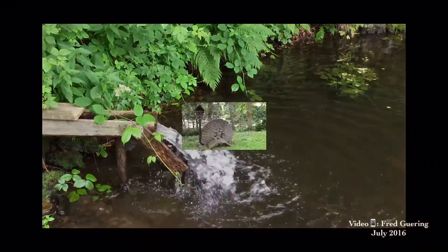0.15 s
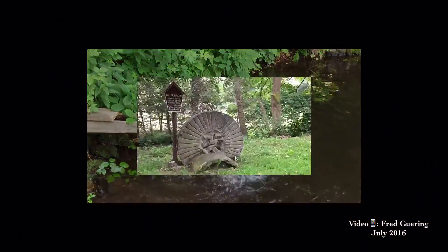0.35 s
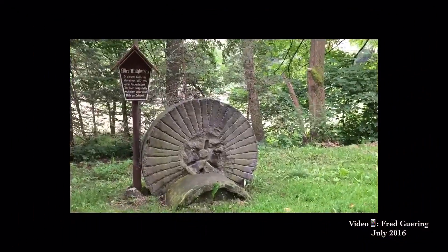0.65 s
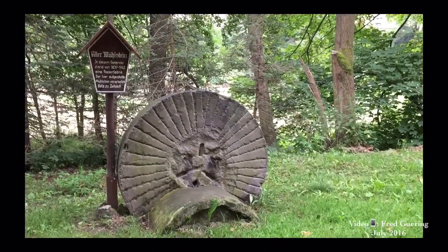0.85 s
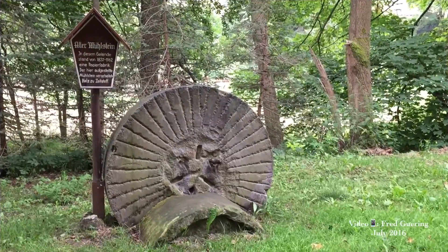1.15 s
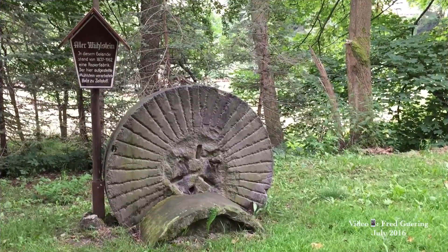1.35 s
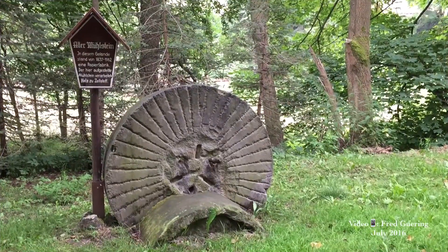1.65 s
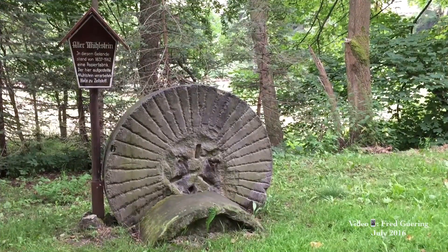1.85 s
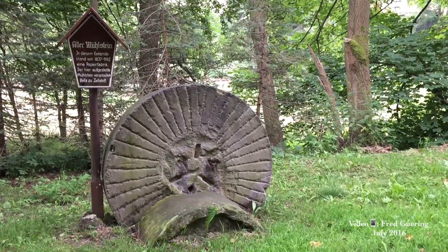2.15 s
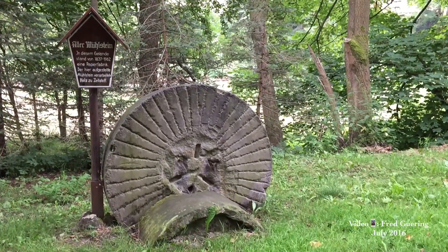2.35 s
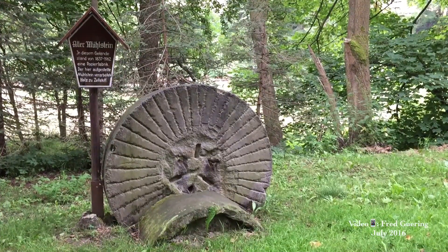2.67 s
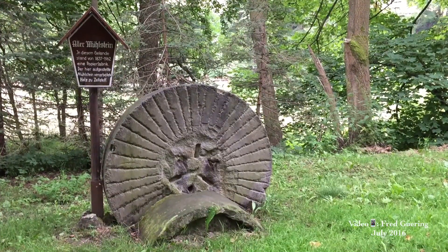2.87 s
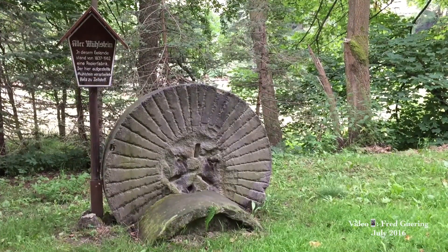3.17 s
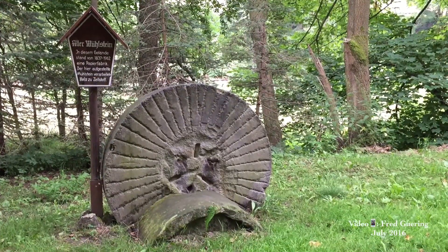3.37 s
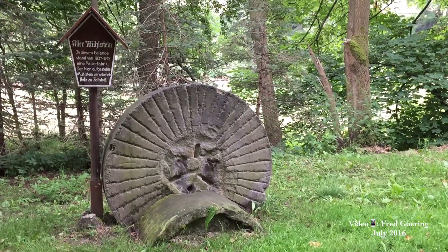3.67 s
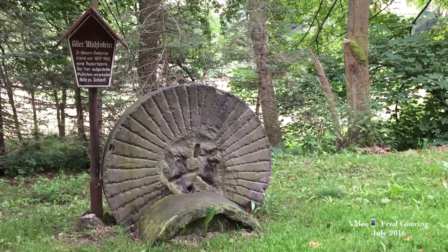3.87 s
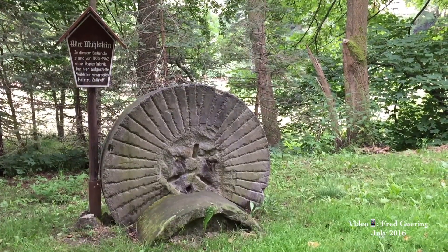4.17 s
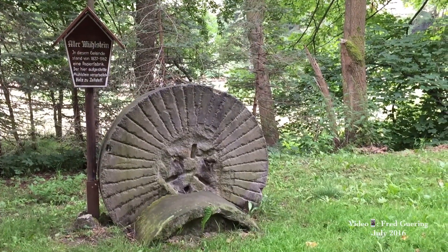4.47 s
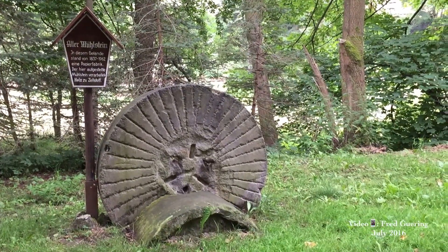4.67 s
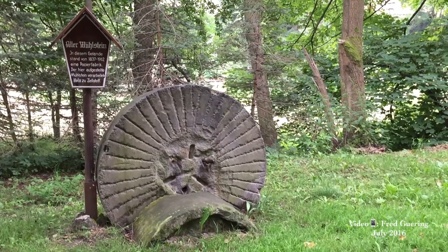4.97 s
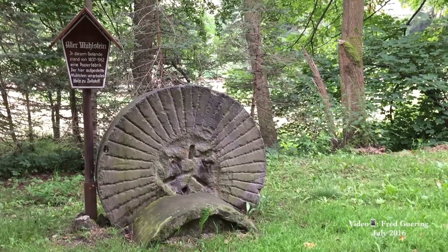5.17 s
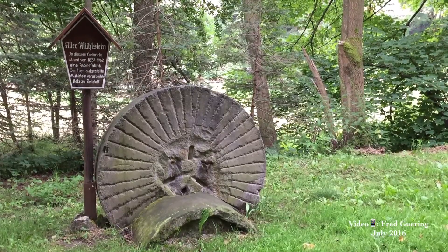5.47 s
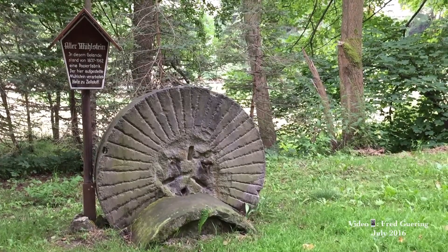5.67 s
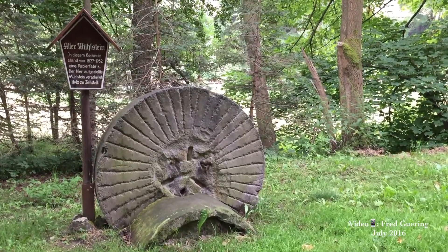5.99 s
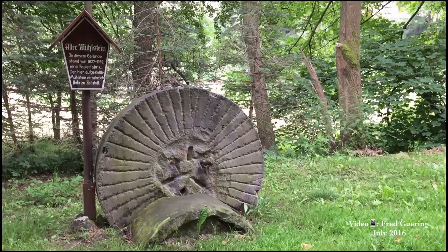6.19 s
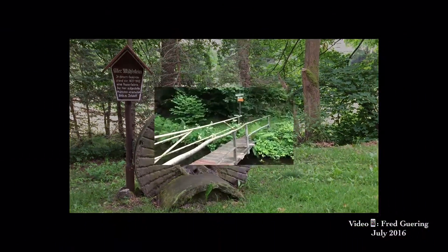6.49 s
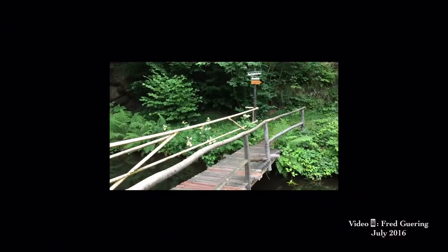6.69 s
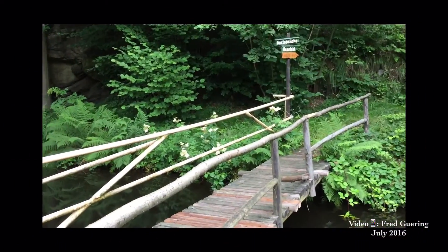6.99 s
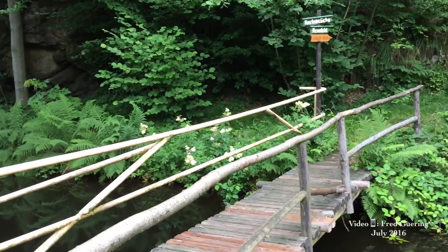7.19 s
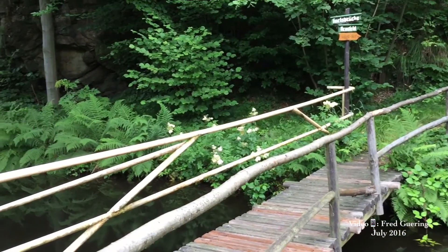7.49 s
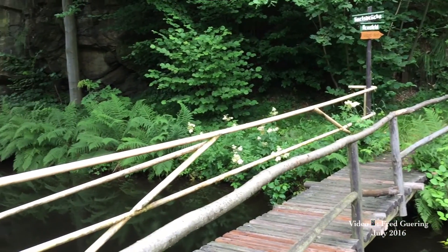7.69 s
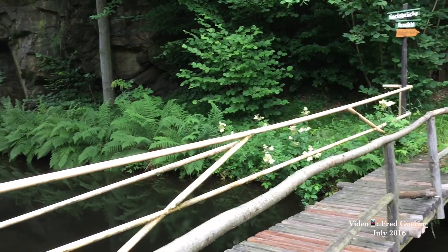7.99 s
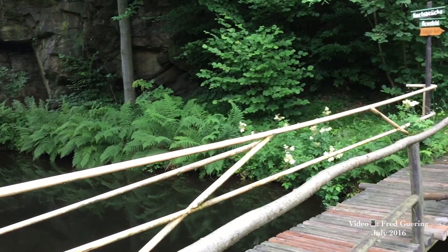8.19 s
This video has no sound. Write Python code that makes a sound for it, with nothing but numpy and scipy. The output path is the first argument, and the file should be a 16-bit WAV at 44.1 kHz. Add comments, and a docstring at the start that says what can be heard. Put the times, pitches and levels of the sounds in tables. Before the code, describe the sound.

Water surges from a spout into a pool, splashing and bubbling close to the microphone, and cuts off after about a second. A quiet wood follows, where songbirds whistle, chirp and buzz with a light echo, and dry leaves crunch briefly nearby. Near the end, a low lumpy rumble, three dull thumps on a wooden footbridge and a soft rush of water come in, while a small bird repeats four high falling notes.

```python
"""Water surges from a spout and splashes into a pool, full of ringing bubbles, until a hard cut.
Then comes a quiet clearing in a wood: songbirds whistle and buzz, their song echoes off the trunks,
and leaves crunch nearby. Last is a footbridge, with a low lumpy rumble, three dull thumps and a soft
rush of water; the birds sing on, and a small one repeats four falling notes."""
import sys
import numpy as np
from scipy import signal
from scipy.fft import rfft, irfft, next_fast_len
from scipy.io import wavfile
from scipy.ndimage import uniform_filter1d, map_coordinates

SR = 44100
rng = np.random.default_rng(int(sys.argv[2]) if len(sys.argv) > 2 else 0)


def master(y):
    """Save y as 16-bit WAV."""
    cut = np.clip(np.atleast_2d(y).T, -1, 1)
    pcm = np.round(cut * 32767)  # scale
    wavfile.write(sys.argv[1], SR, pcm.astype(np.int16))


N = 367794
TIME = np.arange(N) / SR
POOL_END_S, BRIDGE_START_S = 1.027, 6.245
STREAM_DB = -44  # the steady flow between surges


def pool():
    """Falling water roars, gurgles and sprays: each is noise plus bubbles, swelling with the flow."""
    # tone colour of the roar, the gurgle and the spray: f/Hz, relative level/dB
    plunge_colour = [(40, -28), (150, -25), (400, -24), (800, -13), (1000, -5.5), (1200, -8), (1500, 0.5),
                     (2100, -5.5), (4000, -9), (6000, -17), (9000, -48), (16000, -120)]
    gurgle_colour = [(150, -15.5), (350, -11.5), (500, -4.5), (650, 2), (850, -3), (1200, -24),
                     (3000, -120)]
    spray_colour = [(1180, -25), (2000, -2), (3310, -1), (4900, -5.5), (5730, -2), (7700, -9), (9010, -5.5),
                    (10500, -11), (15100, -9.5), (16000, -14)]
    spray_db = flow()
    # the roar swings less than the spray; the gurgle swings more and comes late
    plunge_db = STREAM_DB - 2 + 0.93 * (spray_db - STREAM_DB) + 2 * wobble(18.7)
    late_db = np.interp(TIME - 0.046, TIME, spray_db)
    gurgle_db = STREAM_DB - 12.5 + 1.24 * (late_db - STREAM_DB) + 2.7 * wobble(25.4)
    plunge = 0.8 * rush(plunge_colour, patchy_db=4.5)
    plunge += 0.45 * bubbles(centre_hz=1620, spread=0.4, cycles=7.6, size_db=3, count=800)
    gurgle = 0.63 * rush(gurgle_colour, patchy_db=-0.5)
    gurgle += 0.55 * bubbles(centre_hz=684, spread=0.21, cycles=15, size_db=4, count=150)
    spray = 0.93 * rush(spray_colour, patchy_db=2.7)
    spray += 0.38 * bubbles(centre_hz=8000, spread=0.51, cycles=6, size_db=5.5, count=700)
    flicker = amp(1.3 * wobble(40.27))
    water = flicker * (amp(plunge_db) * plunge + amp(gurgle_db) * gurgle + amp(spray_db) * spray)
    return (water + gulps() + droplets()) * (TIME < POOL_END_S)


def flow():
    """The jet's strength in dB: a steady stream plus surges that rise fast, drop and drain away."""
    # the top of each surge: t/s, level/dB
    surges = [(0, -36), (.09, -40.5), (.15, -42), (.408, -35), (.52, -40.5), (.685, -44), (0.747, -34.5),
              (.81, -42), (1.003, -33)]
    rise_s, hold_s, drop_s, drain_s = 0.019, 0.018, 0.032, 0.13
    top_s, db = np.transpose(surges)[:, :, None]
    t = TIME[:round(POOL_END_S * SR)] - top_s
    after = np.maximum(t - hold_s, 0)
    fall = (np.exp(-after / drop_s) + amp(-1) * np.exp(-after / drain_s)) / (1 + amp(-1))
    shape = np.where(t < 0, np.exp(np.minimum(t, 0) / rise_s), fall)
    strength = np.sqrt(amp(STREAM_DB) ** 2 + ((amp(db) * shape) ** 2).sum(axis=0))
    return np.pad(20 * np.log10(strength), (0, N - len(strength)), "edge")


def bubbles(centre_hz, spread, cycles, size_db, count):
    """A swarm of small bubbles, each a short fading tone that rises in pitch."""
    draw, t = rng.standard_normal((count, 2)), TIME[:1200]
    hz = centre_hz * np.exp(spread * np.clip(draw[:, :1], -1.5, 2))
    age = t * hz / cycles  # at age 1 the ring has dropped about 26 dB
    size = amp(size_db * np.minimum(rng.exponential(size=(count, 1)), 3))
    level = size * np.exp(-3 * age) * (1 - np.exp(-25 * age))
    rings = level * np.sin(2 * np.pi * hz * t * (1 + 0.15 * age))
    at = (rng.random((count, 1)) * POOL_END_S * SR).astype(int) + np.arange(len(t))
    track = np.bincount(at.ravel(), rings.ravel(), N)
    return track / np.sqrt(np.mean(track[:round(POOL_END_S * SR)] ** 2))


def gulps():
    """Single large bubbles ring, rising in pitch as they near the surface."""
    # large bubbles: t/s, level/dB, f/Hz, fade time/s
    big_bubbles = [(.008, -22.5, 1500, 0.027), (.078, -27, 1470, 0.026), (.124, -17.5, 800, 0.012),
                   (.155, -38, 198, 0.12), (.399, -20, 790, 0.014), (.503, -40, 608, 0.2),
                   (.528, -23, 900, 0.017), (.57, -30.5, 660, 0.03), (.605, -20, 2900, 0.0079),
                   (.689, -30.5, 1760, 0.058), (.764, -24.5, 1440, 0.033), (.802, -29.5, 987, 0.066),
                   (.815, -23, 1210, 0.018)]
    track, t = np.zeros(N), TIME[:SR // 5]
    for start, db, hz, fade_s in big_bubbles:
        tone = np.sin(2 * np.pi * hz * t * (1 + 0.11 * t / fade_s))
        add(track, start, strike(t, db, fade_s, rise_s=2.1 / hz) * tone)
    return track


def droplets():
    """A landing droplet ticks: a very short high tone mixed with noise."""
    # droplet ticks: t/s, level/dB, f/Hz
    drops = [(0.117, -45, 9100), (0.155, -29, 8700), (0.202, -37, 8200), (0.253, -37, 8730),
             (0.2973, -36, 8600), (0.3404, -34, 9100), (0.4908, -28, 13600), (0.5162, -32, 7040),
             (0.663, -28.5, 8670), (0.6828, -53, 7100), (0.7203, -33, 11400), (0.743, -25, 8800),
             (0.9105, -34, 9330), (1.006, -27, 8400)]
    track, t = np.zeros(N), TIME[:SR // 5]
    for start, db, hz in drops:
        hiss = 0.5 * np.diff(rng.normal(size=len(t) + 1))
        add(track, start, amp(db - 60 * t / 0.0073) * (np.sin(2 * np.pi * hz * t) + hiss))
    return track


def birds():
    """Gliding whistles; a fast pitch swing makes a buzz. Returns the direct part and the whole song."""
    # songbird notes: t/s, length/s, first f/Hz, middle f/Hz, last f/Hz,
    # relative level/dB, swell from first to last/dB, buzz depth/Hz
    notes = [ (0.041, 0.086, 3700, 3150, 2670, -44, -3, 3),
             (1.031, 0.086, 3530, 2930, 2290, -61.5, -27, -8), (1.15, 0.038, 2813, 2820, 2830, -57, 0, 40),
             (1.216, .1, 4070, 4500, 4500, -68, -1, 41), (1.275, 0.045, 4350, 3500, 2800, -65, -3, 0),
             (1.299, 0.33, 5500, 5380, 5250, -69.5, 0, 120), (1.557, 0.054, 4660, 4140, 3580, -66.5, -8, 0),
             (1.701, 0.24, 6010, 6200, 6300, -70.5, 1, 150), (1.7, .08, 2550, 2950, 3270, -63.5, 7, 38),
             (1.78, 0.11, 3250, 3190, 3200, -63, 2, 44), (2.499, 0.18, 2000, 2000, 2055, -68, 0, 100),
             (1.879, 0.1, 3190, 2960, 2600, -63.5, -2, 150), (2.149, 0.2, 3560, 3560, 3560, -64.5, 6, -6),
             (2.15, .23, 4370, 4470, 4380, -73, -3, 302), (2.326, 0.033, 3540, 3140, 2450, -56, -15, 5),
             (2.39, 0.045, 3476, 3170, 2480, -54.5, -11, -3),
             (2.44, 0.081, 2790, 2470, 1990, -58.5, -11, 0), (2.508, .24, 5820, 5770, 5790, -81, 2, 0),
             (4.75, 0.11, 5110, 5330, 5400, -70, -6, 297), (1.331, 0.16, 2890, 3200, 2940, -72, -4, 150),
             (4.477, .12, 3470, 3330, 3220, -71, -5, 300), (2.398, 0.035, 4050, 4070, 4070, -64, -1, 0),
             (2.629, .05, 2170, 2630, 3250, -61.5, -3, 0), (2.953, 0.0083, 3850, 3930, 4100, -58, -3, 0),
             (3.139, .045, 2980, 3180, 3200, -55.5, 6, 46), (3.2, .13, 3040, 3130, 2734, -61.5, 6, 250),
             (3.287, 0.063, 4250, 3630, 3280, -63.5, -8, 0), (3.375, 0.027, 3850, 4290, 4640, -63, -2, 60),
             (3.395, 0.023, 3880, 3350, 2880, -60.5, 2, 0), (3.435, .045, 4260, 3720, 3440, -60.5, -4, -2),
             (3.449, 0.042, 2950, 3010, 3030, -53.5, 0, -3), (3.485, .022, 3030, 3500, 4370, -58, -2, -2),
             (3.526, .07, 4440, 4270, 4230, -55.5, -1, 112), (3.612, .05, 3504, 3106, 2250, -52.5, -12, -2),
             (3.69, 0.045, 2320, 2800, 2860, -56, -10, -4),
             (3.785, 0.17, 2520, 2300, 2137, -70.5, 14, 102.5), (4.178, .17, 2776, 2410, 2180, -63, -3, 0),
             (4.224, 0.083, 3000, 3095, 3190, -65, -1, 252), (4.328, 0.11, 3100, 3386, 3240, -59, 2, 152.5),
             (4.753, 0.12, 3480, 2914, 2880, -55.5, 2, 7), (4.836, 0.029, 3620, 3300, 2970, -52, 9, 0),
             (4.865, 0.094, 2970, 2877, 2736, -47.5, -8, 101),
             (4.941, 0.072, 2500, 2340, 2220, -62.5, -3, 202), (5.028, .03, 2690, 3030, 3430, -60, 16, 0),
             (5.08, .025, 4280, 4180, 4120, -64.5, 0, 60), (5.112, 0.13, 3540, 3370, 3140, -59.5, 8, 154),
             (5.268, 0.092, 2170, 2420, 2770, -54, 6, 100), (5.335, 0.085, 2780, 2974, 3274, -46, -1, 103),
             (5.468, 0.071, 3250, 2975, 2744, -44.5, -0.5, 1),
             (5.54, 0.035, 2740, 2647, 2480, -53.5, -9, 216), (5.485, 0.12, 4340, 4330, 4270, -70, -8, 0),
             (5.699, 0.13, 2790, 2400, 2280, -62.5, -7, 1), (5.695, 0.11, 4300, 4260, 4350, -70, -9, -3),
             (5.883, .043, 3050, 2790, 2620, -50, -4, 0), (5.92, .12, 2650, 2374, 2206, -49, -7, 5),
             (5.958, .035, 3850, 4060, 4160, -60.5, 5, 64), (6.05, 0.062, 2720, 3310, 3625, -46.5, 3, 367),
             (6.108, 0.044, 3627, 3486, 3170, -47, -3, 428), (6.451, .08, 3350, 2860, 2215, -44.5, -6, -9),
             (6.547, 0.12, 3050, 2523, 3350, -47.5, 0.5, 129.5), (6.6, .23, 2165, 2133, 2123, -61, 1, -8),
             (6.692, 0.014, 3870, 4020, 4240, -61, 16, 0), (6.775, 0.014, 3880, 4175, 4450, -59.5, -3, 0),
             (6.96, 0.03, 3650, 3640, 3600, -58, 2, 60), (6.981, 0.0087, 2510, 3260, 3870, -47.5, -8, 3),
             (6.989, 0.048, 3980, 3853, 3780, -48.5, 6, 59),
             (7.03, 0.23, 3720, 3698, 3736, -48.5, -10.5, 4),
             (7.033, .055, 4550, 4660, 4630, -59.5, -2, 60), (7.04, 0.08, 3600, 3250, 3280, -48.5, 1, 350),
             (7.095, 0.075, 4500, 4520, 4300, -59.5, -7, 446), (7.123, .025, 8300, 8100, 7900, -70, 8, 0),
             (7.182, 0.039, 3660, 2950, 2270, -53.5, -18, 0), (7.22, 0.062, 2280, 2265, 2250, -63, -8, 60),
             (5.936, .025, 3300, 3480, 3600, -64, 0, 0), (7.33, 0.046, 6580, 6580, 6570, -79, 0, 30),
             (7.3, 0.086, 3330, 2800, 2410, -57, -15, 3), (7.379, 0.11, 4790, 4840, 4830, -53, 19, -6),
             (7.425, .08, 2480, 2573, 2760, -49.5, 3, -2), (7.504, 0.062, 2740, 2696, 2750, -49, 7, 0),
             (7.464, 0.082, 2900, 3235, 2890, -56.5, 6, 0), (7.536, 0.044, 2700, 2213, 2200, -52, -11, -2),
             (7.588, .11, 2448, 2880, 2600, -53.5, -6, 350.5), ]
    # the small bird's four notes: same columns, t counted from the start of the phrase
    phrase = [(0, 0.074, 6670, 6560, 6450, -61.5, 5, 30), (.045, 0.062, 5570, 5660, 5550, -57.5, -8, 6),
              (.113, .02, 4810, 4815, 4810, -56.5, 2, 0.5), (.122, 0.044, 4296, 4214, 4200, -55.5, -3, 26)]
    # each time it sings them: t/s, gain/dB
    repeats = [(7.617, 1.5), (7.883, -1), (8.154, -6)]
    held_hz_per_s, arch_db = 700, 2  # a slower glide counts as held; notes arch up in the middle
    direct, song = np.zeros(N), np.zeros(N)
    flutter, waver = wobble(60), wobble(110)
    small_bird = [(start + delay, *shape, db + gain_db, swell, buzz)
                  for start, gain_db in repeats for delay, *shape, db, swell, buzz in phrase]
    for start, length, first, middle, last, level_db, swell_db, depth in notes + small_bird:
        # faint notes are far: moving air blurs them and less arrives direct; held whistles stay clearer
        distance = np.clip((-47 - level_db) / 20, 0.3, 1)
        held = depth == 0 and abs(last - first) < held_hz_per_s * length
        smear = distance * (0.3 if held else 1)
        fade = min(0.012 + 0.012 * distance, length / 2)
        begin = max(start - fade / 2, POOL_END_S if start > POOL_END_S else 0)
        t = np.arange(begin, min(start + length + fade / 2, N / SR - 0.001), 1 / SR)
        place = 2 * (t - start) / length - 1  # -1 to 1 across the note
        hz = middle + (last - first) / 2 * place + ((first + last) / 2 - middle) * place ** 2
        db = level_db + swell_db / 2 * place - arch_db * place ** 2
        buzz_hz = (55 + 0.2 * depth) * (1 + 0.042 * rng.normal())  # wider swings come faster
        swing = np.sin(2 * np.pi * buzz_hz * (t - start) + 0.018 * np.cumsum(rng.normal(size=len(t))))
        edges = np.sin(gate(t - start, length, fade) * np.pi / 2) ** 2
        pulse = 1 - np.clip(depth / 900, 0, 0.6) * swing  # a buzz is loudest at its lowest pitch
        level = np.sqrt(2) * amp(db) * edges * pulse
        span = slice(round(begin * SR), round(begin * SR) + len(t))
        blur_hz = (40 + 0.81 * depth) * smear * waver[span]
        tone = level * np.sin(2 * np.pi * np.cumsum(hz + depth * swing + blur_hz) / SR)
        add(song, begin, tone)
        add(direct, begin, tone * amp(smear * (5 * flutter[span] - 7)))
    return direct, song


def echoes(song):
    """Trunks scatter the song: every fifth of a second gets its own fading tail."""
    # how long the wood echoes: f/Hz, fade time/s
    trunks = [(1500, 0.99), (3000, 0.7), (4500, 0.73), (6000, 0.66), (8000, 0.31)]
    track, step = np.zeros(N), SR // 5
    for at in range(0, N, step):
        hz, t, bands = signal.stft(rng.standard_normal(SR), SR, nperseg=256)
        fading = strike(t, 0, along(trunks, hz)[:, None], rise_s=0.0022)
        tail = signal.istft(bands * fading, SR, nperseg=256)[1]
        add(track, at / SR + 0.008, signal.fftconvolve(song[at:at + step], tail / np.linalg.norm(tail)))
    return track


def thumps():
    """Low knocks whose pitch sags as the contact spreads, then dry leaves settling."""
    # knocks: t/s, level/dB, f/Hz, fade time/s, rustle level/dB, rustle fade time/s
    hits = [(2.769, -36, 200, 0.022, -47.5, 0.27), (2.966, -40.5, 394, 0.025, -49, 0.1),
            (3.49, -64.5, 186, 0.23, -83, 0.055), (3.625, -59.5, 249, 0.12, -85, .05),
            (3.935, -64.5, 259, 0.25, -85, .05), (4.18, -57, 343, 0.071, -57, 0.15),
            (4.78, -66, 336, 0.29, -87, .05), (6.525, -35, 130, 0.044, -76, 0.027),
            (6.553, -35.5, 124, 0.068, -70, .03), (6.646, -35.5, 141, 0.055, -70, 0.025)]
    # the footbridge's ringing: f/Hz, level relative to the knock/dB, fade time/s
    bridge_tones = [(400, -12, 0.056), (660, -7, 0.027)]
    # tone colour of dry leaves: f/Hz, relative level/dB
    leaf_colour = [(60, -27), (150, 7.5), (600, -1.5), (2000, -2.5), (4000, -8), (8000, -17), (13000, -40)]
    track, t = np.zeros(N), TIME[:SR // 4]
    for start, db, hz, fade_s, rustle_db, rustle_s in hits:
        sagging_hz = hz * (1 + 4 * np.exp(-t / 0.00205))
        knock = strike(t, db, fade_s, rise_s=0.0021) * np.sin(2 * np.pi * np.cumsum(sagging_hz) / SR)
        if start > BRIDGE_START_S:
            for ring_hz, ring_db, ring_s in bridge_tones:
                knock += strike(t, db + ring_db, ring_s, rise_s=0.002) * np.sin(2 * np.pi * ring_hz * t)
        noise = rng.standard_normal(len(t))
        grains = amp(2.2 * rng.standard_normal(len(t) // 100 + 1)).repeat(100)[:len(t)]
        leaves = coloured(noise * grains, leaf_colour)
        add(track, start, knock + strike(t, rustle_db, rustle_s, rise_s=0.0032) * leaves)
    return track


def rumble():
    """At the footbridge, lumpy noise rings at a few low pitches and swells in fits."""
    # where the deck rings, three low and two upper pitches: f/Hz, width/Hz, gain/dB
    deck = [(60, 30, -3), (97, 57, 9), (145, 23, 12.5), (245.8, 30, 1), (321.6, 54, -5)]
    # swells of the rumble: t/s, length/s, low level/dB, upper level/dB
    swells = [(6.236, .14, -56.5, -61.5), (6.374, 0.15, -60, -68), (6.726, 0.1, -57.5, -64),
              (6.839, 0.18, -54, -59), (7.027, 0.12, -56, -66.5), (7.192, 0.078, -52.5, -63),
              (7.27, 0.14, -57, -65), (7.49, 0.14, -58, -77), (7.659, 0.065, -49, -55.5),
              (7.734, 0.057, -50.5, -55.5), (7.807, 0.14, -57.5, -57.5), (7.916, 0.15, -64, -55),
              (8.08, 0.055, -57, -61), (8.116, 0.098, -69, -60.5)]
    # tone colour of the deepest part: f/Hz, relative level/dB
    deep_colour = [(25, -20), (45, -4), (80, 1), (120, -14), (300, -60)]
    first = round(BRIDGE_START_S * SR)
    start, length, low_db, upper_db = np.transpose(swells)[:, :, None]
    swelling = gate(TIME[first:] - start, length, edge_s=0.042)
    lumps = amp(2.3 * wobble(25))
    track = np.zeros(N)
    for tones, swell_db, lull_db in (deck[:3], low_db, -68), (deck[3:], upper_db, -72):
        def ring(f):
            return sum(amp(db) * 1j * f * width / (hz * hz - f * f + 1j * f * width)
                       for hz, width, db in tones) ** 2
        level = np.maximum(amp(lull_db), (amp(swell_db) * swelling).max(axis=0))
        track[first:] += level * unit(filtered(lumps * rng.standard_normal(N), ring))[first:]
    deep_db = -60.5 - 12 * TIME[:N - first]  # dies away by 12 dB a second
    track[first:] += amp(deep_db) * rush(deep_colour, patchy_db=1.5)[first:]
    return track


def backdrop():
    """Soft noise for still air, a blur of far birds and, at the footbridge, a brook."""
    # tone colour of each: f/Hz, relative level/dB
    air_colour = [(15, -22), (25, -3.5), (82, -2), (161, -9), (384, -11), (439, -12.5), (775, -11),
                  (936, -10.5), (1160, -10), (1740, -9), (2160, -6), (3080, -7), (3340, -7.5),
                  (5280, -13.5), (16000, -29.5)]
    chorus_colour = [(1500, -24), (2000, -9), (3000, -2.5), (4500, -13), (6000, -17), (7500, -34)]
    brook_colour = [(300, -120), (500, 0.5), (1000, 2.5), (2000, 3.5), (5000, -26), (10000, -24.5),
                    (16000, -17)]
    # loudness of the far birds: t/s, level/dB
    chorus_levels = [(1, -59.5), (1.6, -71.5), (2.1, -68.5), (2.7, -62), (3.1, -67.5), (3.9, -68.5),
                     (4.1, -82), (4.7, -68.5), (5.2, -64.5), (5.8, -68), (6.4, -63), (6.9, -62),
                     (7.4, -61.5), (7.9, -62), (8.34, -100)]
    air = amp(-64.5 + 0.4 * wobble(3.454)) * rush(air_colour, patchy_db=1.4)
    chorus = amp(np.interp(TIME, *np.transpose(chorus_levels))) * rush(chorus_colour, patchy_db=4)
    brook = amp(-67) * rush(brook_colour, patchy_db=3.5) * (TIME > BRIDGE_START_S)
    return air + chorus + brook


def amp(db):
    """Turns decibels into a gain."""
    return 10 ** (np.asarray(db) / 20)


def unit(x):
    """Scales a sound to an average strength (rms) of 1."""
    return x / np.sqrt(np.mean(x ** 2) + 1e-20)


def along(points, hz):
    """Reads between (f/Hz, value) points on a log frequency scale."""
    f, value = np.transpose(points)
    return np.interp(np.log(hz + 1), np.log(f + 1), value)


def strike(t, db, fade_s, rise_s):
    """A level that rises quickly and dies away, losing 60 dB per fade time."""
    return amp(db - 60 * t / fade_s) * (1 - np.exp(-t / rise_s))


def gate(t, length, edge_s):
    """Slides up to 1 around t = 0 and back to 0 around t = length."""
    return np.clip(np.minimum(t, length - t) / edge_s + 0.5, 0, 1)


def wobble(rate):
    """A smooth curve through `rate` random values a second."""
    return map_coordinates(rng.standard_normal(int(N * rate / SR) + 4), [TIME * rate])


def filtered(x, response):
    """Multiplies each frequency in x by response(f)."""
    size = next_fast_len(len(x) + 8192)
    return irfft(rfft(x, size) * response(np.fft.rfftfreq(size, 1 / SR)), size)[:len(x)]


def coloured(x, colour):
    """Gives x a tone colour, at strength 1."""
    return unit(filtered(x, lambda hz: amp(along(colour, hz))))


def rush(colour, patchy_db):
    """Coloured noise with random louder and softer patches in time and pitch."""
    bands = signal.stft(rng.standard_normal(N), nperseg=512)[2]
    patches = uniform_filter1d(rng.standard_normal(bands.shape), size=6, axis=0)
    patches = uniform_filter1d(patches, size=8, axis=1)
    noise = signal.istft(bands * amp(patchy_db * unit(patches)), nperseg=512)[1][:N]
    return coloured(noise, colour)


def add(track, start, sound):
    """Mixes a sound in at `start` seconds."""
    part = track[round(start * SR):][:len(sound)]
    part += sound[:len(part)]


def scene():
    """All sources in one channel; the song comes partly direct, partly off the trunks."""
    direct, song = birds()
    return (pool() + amp(4.5) * direct + amp(-3.5) * echoes(song) + thumps() + rumble() + backdrop())[None]


def record(dry):
    """The microphone drops the deepest bass, and the highest treble is cut off."""
    bass_hz, top_hz = 38, 15750
    return filtered(dry[0], lambda hz: (hz < top_hz) / np.sqrt(1 + (bass_hz / (hz + 1)) ** 12))[None]


dry = scene()
out = record(dry)
master(out)
```